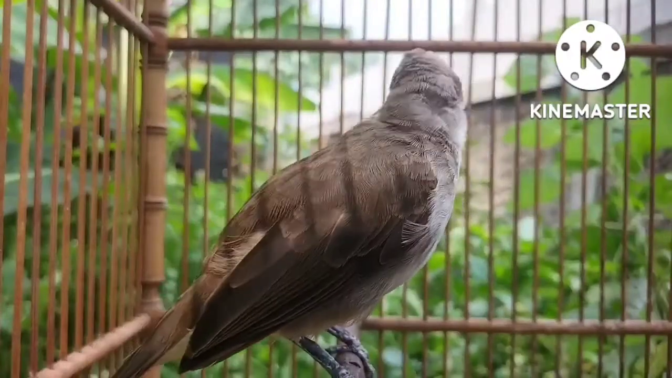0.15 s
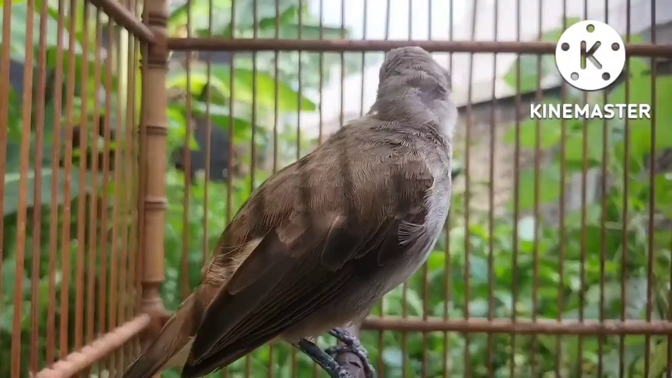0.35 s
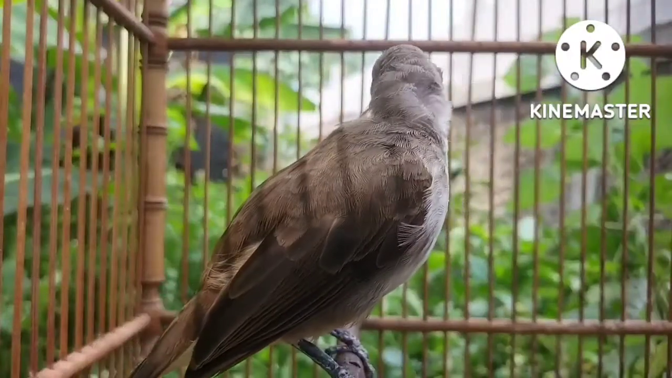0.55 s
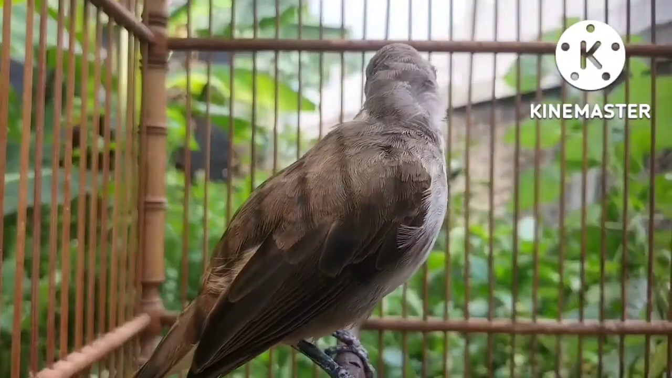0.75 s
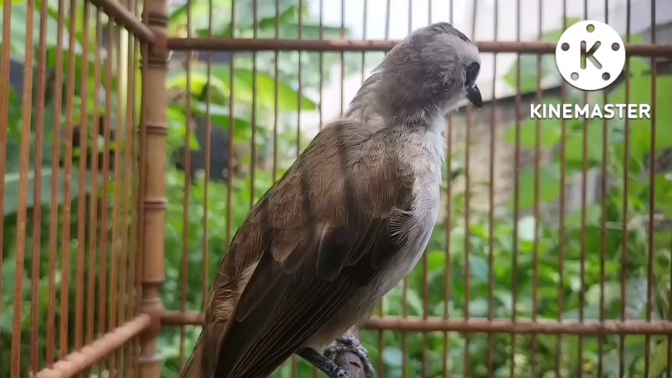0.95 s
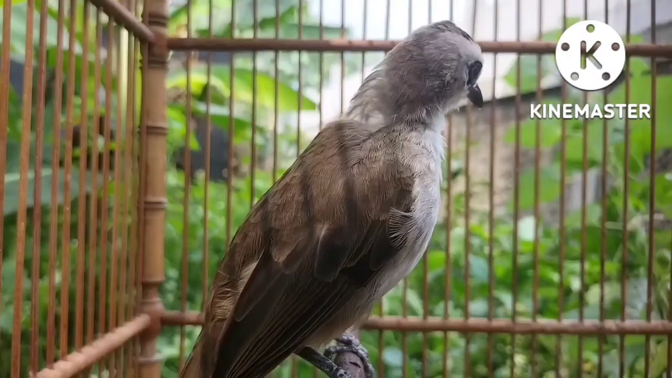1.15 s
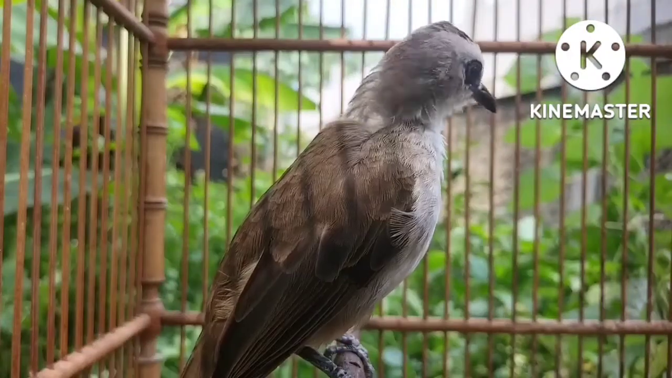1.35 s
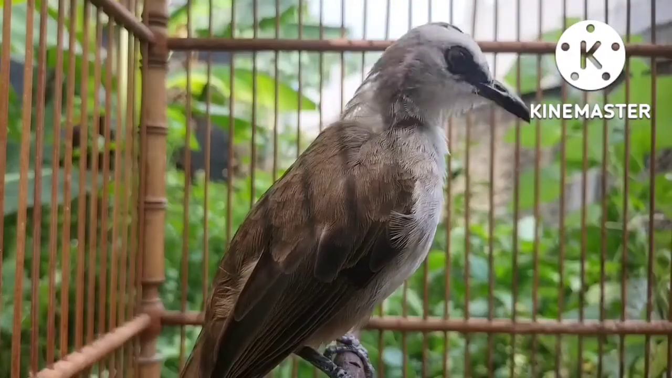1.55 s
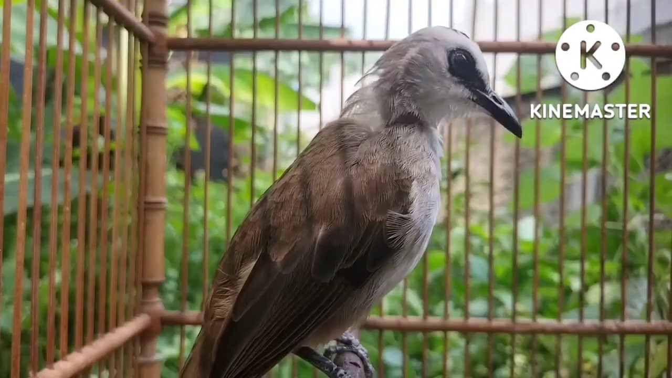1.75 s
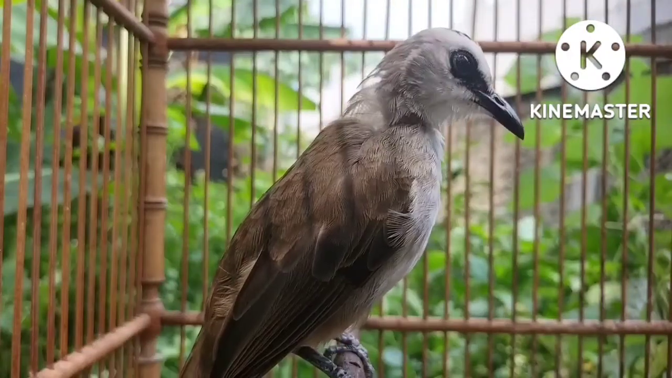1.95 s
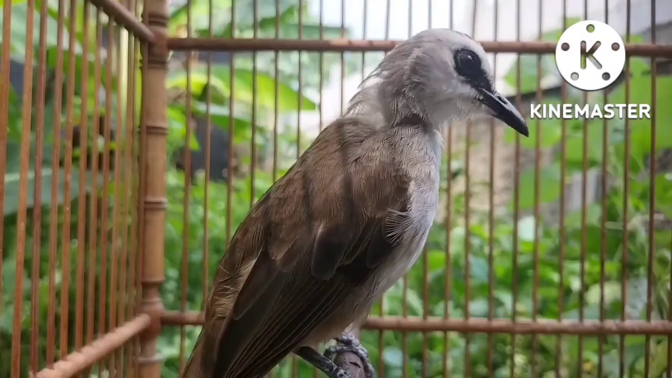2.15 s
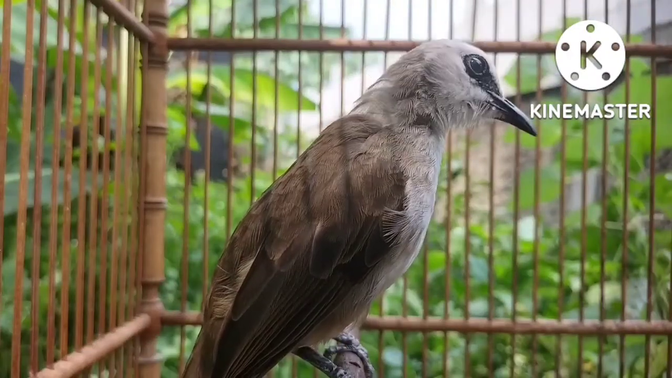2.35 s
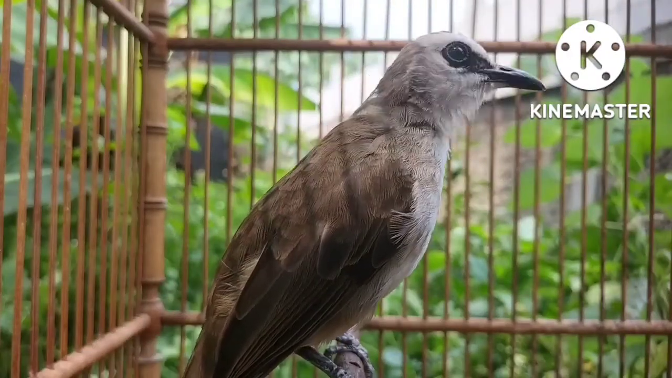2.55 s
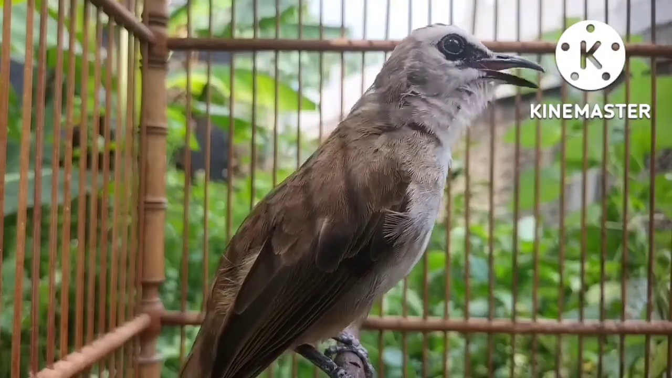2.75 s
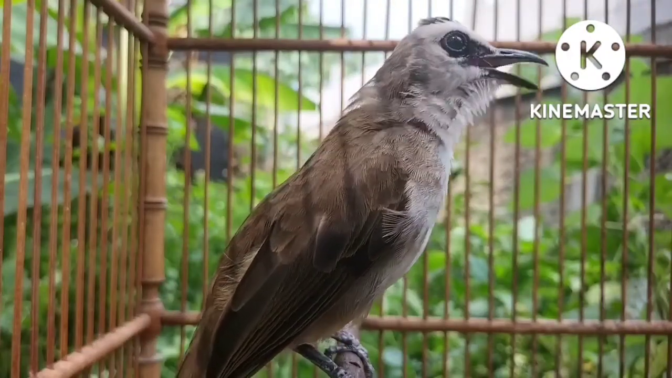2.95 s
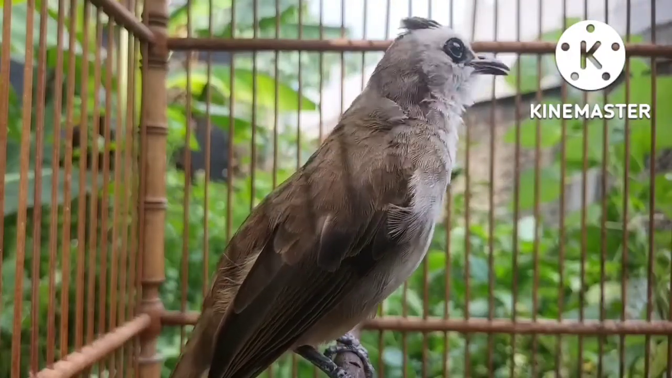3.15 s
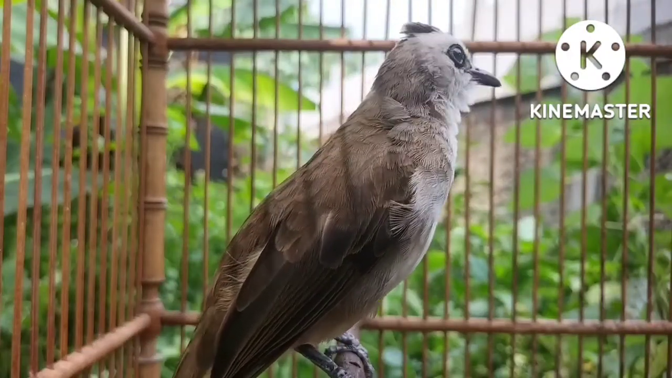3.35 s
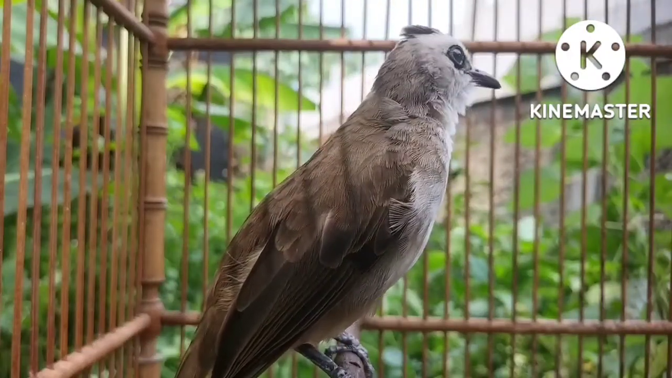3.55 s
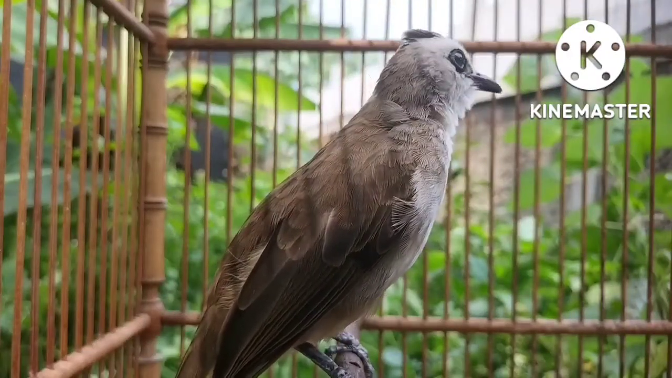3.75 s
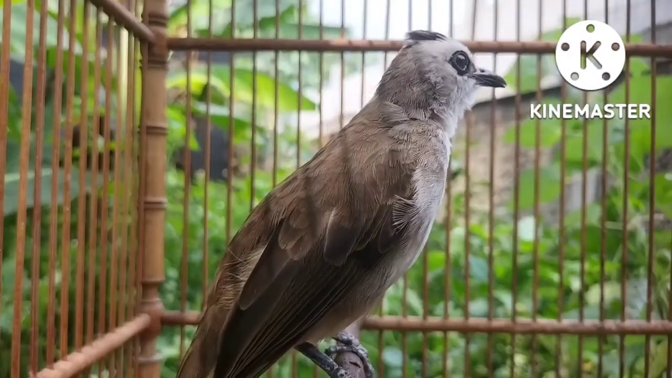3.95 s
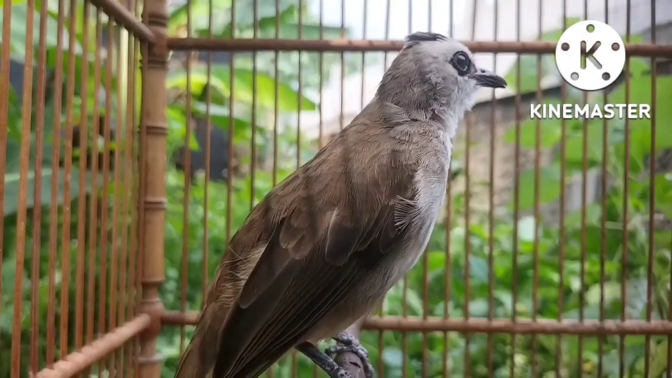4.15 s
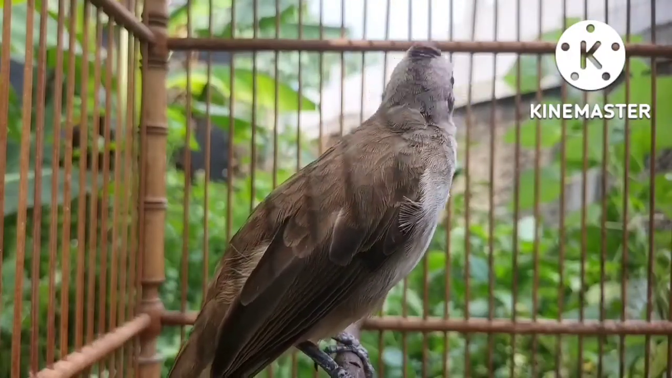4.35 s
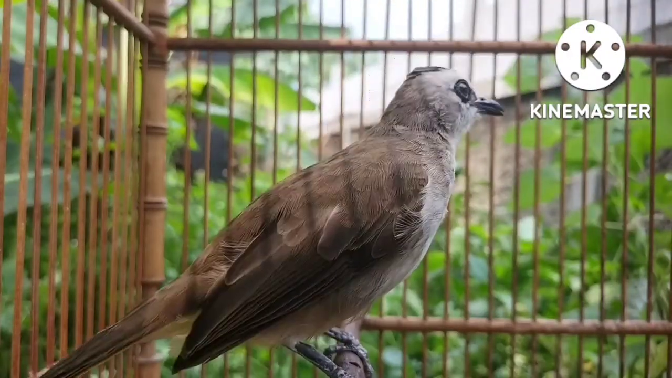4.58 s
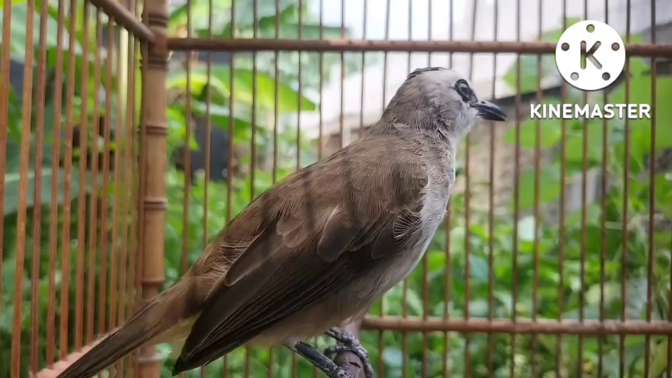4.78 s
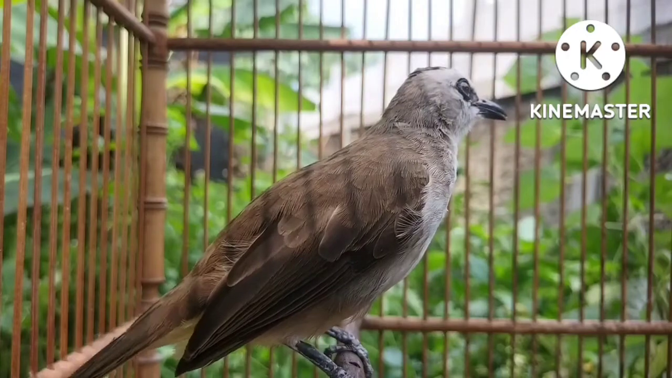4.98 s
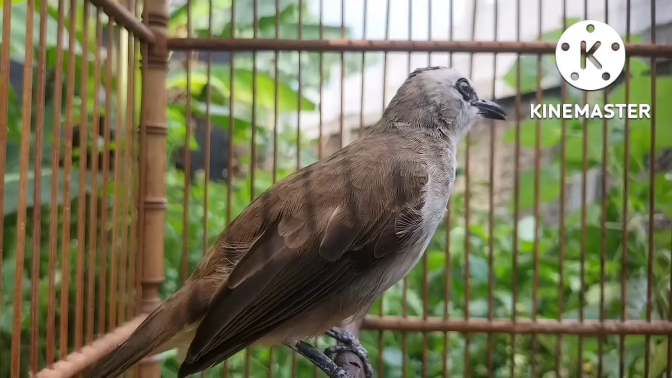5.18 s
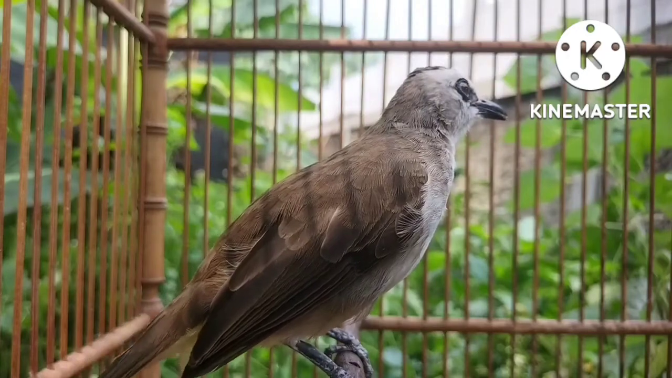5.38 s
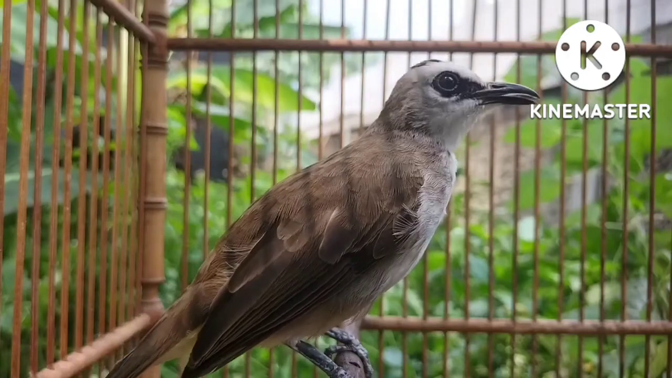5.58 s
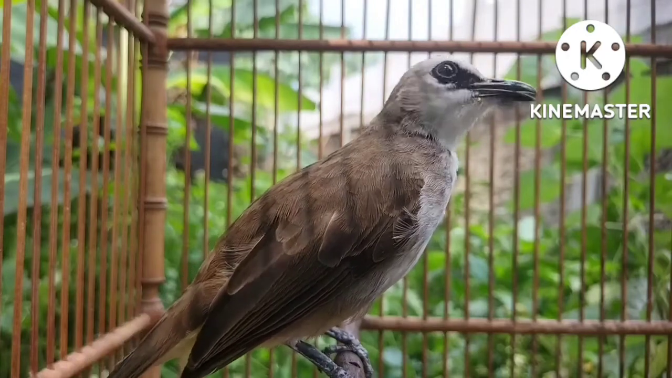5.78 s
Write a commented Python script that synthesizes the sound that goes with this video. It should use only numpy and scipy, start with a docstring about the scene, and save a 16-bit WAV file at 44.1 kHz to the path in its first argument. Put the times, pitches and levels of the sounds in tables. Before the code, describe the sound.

Soft bumps and perch rustles lead to three loud, slightly distorted bird chirps, with a faint cricket and distant engines behind.

```python
"""On a porch, a caged bulbul right in front of the microphone, the garden behind. At first there is only
rumble, a far engine and the thin buzz of a bush cricket's wings. After a second come dull bumps, then
ticks and rustles on the perch. From 2.8 s the bird gives three sharp calls that overload the microphone,
each a quick arch of pitch whose harmonics sweep through the throat resonance; cage and porch answer.
Afterwards faint birds whistle far off and an engine drones again under the cricket."""
import sys
import numpy as np
from scipy import signal
from scipy.fft import rfft, irfft
from scipy.io import wavfile

SR = 44100
rng = np.random.default_rng(int(sys.argv[2]) if len(sys.argv) > 2 else 0)


def store_wav(level_fs):
    """Save 16-bit WAV to argv[1]."""
    pcm = np.round(np.clip(np.atleast_2d(level_fs), -1, 1) * 32767)
    wavfile.write(sys.argv[1], SR, pcm.T.astype(np.int16))


N = 256662
TIME = np.arange(N) / SR

# Rumble and air of the garden. Each row: frequency in Hz, relative level in dB.
GARDEN_SPECTRUM = [(20, -17), (45, -6), (68, -1), (100, -4.5), (250, -15), (520, -24), (1050, -24),
                   (1800, -33.5), (2600, -32), (4000, -33.5), (5000, -40), (7300, -37.5), (9200, -50),
                   (16000, -61)]
# Engines far off. Each row: start in seconds, end in seconds, pitch in Hz, level in dB.
ENGINE_DRONES = [(0, 0.96, 81.11, -64.5), (4.3, 5.822, 64.6, -65)]
# Birds far off. Each row: start and length in seconds, start and end pitch in Hz, level in dB,
# waver as a share of the pitch.
FAR_WHISTLES = [(3.83, 0.12, 2262, 2398, -74.5, 0.07), (4.091, 0.069, 2253, 2446, -75, .05),
                (4.181, 0.14, 2356, 2429, -72.5, .05), (5.091, 0.204, 5630, 5570, -83, 0.0059),
                (5.14, 0.119, 6935, 7300, -83, 0.0061), (5.266, 0.083, 7100, 7159, -75, 0.0039),
                (5.391, 0.13, 7400, 7360, -80, .002), (5.349, 0.18, 5460, 5470, -77, 0.002),
                (5.419, 0.099, 2174, 2604, -75, 0.068), (5.201, 0.0487, 1000, 965, -71, 0.065),
                (5.458, 0.055, 760, 742, -67, 0.083)]
# The rasp of the cricket's wings. Each row: frequency in Hz, relative level in dB.
WING_SPECTRUM = [(5500, -44.5), (6700, -22.5), (7800, -23.5), (9000, -46), (11200, -36.5), (11600, -16),
                 (12300, -19), (13000, -13), (13700, -13), (14300, -2), (14550, -5), (14830, 7), (15000, 3),
                 (15130, 5), (15480, 0), (15600, -26)]
# The cricket's spells of song. Each row: start, step down in level and stop, all in seconds.
CRICKET_SPELLS = [(0, 1.855, 2.11), (2.655, 5.59, 5.71)]
# Dull bumps. Each row: middle and half length in seconds, pitch in Hz, level in dB.
LOW_BUMPS = [(1.018, 0.023, 135, -53), (1.067, 0.0087, 180, -48.5), (1.086, 0.014, 105, -44),
             (1.134, 0.013, 195, -47.5), (1.195, 0.017, 104, -44), (1.215, 0.034, 190, -50.5),
             (1.244, .012, 150, -48.5), (1.245, .035, 62, -51), (1.364, 0.016, 155, -53),
             (1.428, 0.025, 158, -55.5)]
# Rustles on the perch. Each row: middle and half length in seconds, centre and width in Hz, level in dB.
PERCH_RUSTLES = [(1.18, 0.11, 191, 179, -59.5), (1.5, 0.25, 150, 139, -62), (2.508, 0.015, 4740, 1204, -62),
                 (2.543, 0.038, 5970, 800, -66.5), (2.565, 0.047, 3960, 950, -64.5)]
# Small ticks in the cage, and short creaky voice pulses just before the calls. Each row: start in
# seconds, level in dB, ring and width in Hz, time to die by 60 dB in seconds.
TICKS_AND_PULSES = [(1.232, -66.5, 3130, 1500, 0.14), (2.510, -61, 4500, 5000, 0.012),
                    (2.554, -54, 4540, 6000, 0.007), (2.587, -56, 5000, 6000, 0.0092),
                    (2.681, -61, 4500, 6000, 0.009), (2.749, -50.5, 3050, 1500, 0.043),
                    (2.7603, -32.5, 3300, 1200, 0.018), (3.0816, -38.5, 1610, 647, 0.025),
                    (3.085, -36, 1948, 708, 0.019), (3.098, -28.5, 2300, 1100, 0.018),
                    (3.1062, -29.5, 2570, 1300, 0.019), (3.61, -54.5, 6920, 1500, 0.11),
                    (3.609, -55.5, 2287, 1500, 0.085)]
# Colour of the porch's echo. Each row: frequency in Hz, relative level in dB.
PORCH_SPECTRUM = [(300, -12), (1000, -8), (1500, -1.5), (2000, -6.5), (2700, -2.5), (3600, -9),
                  (5000, -8.5), (8000, -2), (15000, -21)]
# What throat and beak let through. Each row: frequency as a multiple of the resonance, gain in dB.
THROAT_RESPONSE = [(.15, -79), (.26, -51.5), (0.359, -26), (0.549, -20), (.68, -19), (.83, -4), (1, 0.5),
                   (1.14, -4), (1.331, -15.5), (1.648, -27.5), (2.351, -33.5), (2.85, -55), (4, -63.5)]
# The calls at the microphone. Each row: top of the arch in seconds; start, knee and top pitch in Hz;
# rise and fall in seconds; level in dB; full voice before and after the top in seconds; swell of the
# lead-in and leap to full voice in dB; time and half length of the voice break in seconds, its depth
# in dB; throat resonance in Hz, its sag in octaves; gain of the fundamental and of the overtones
# above the resonance in dB.
BULBUL_CALLS = [(2.784, 1082, 1263, 1864, 0.0084, 0.011, 0, 0.0028, 0.0125, 21.5, 15.5, 2.786, 0.0055, 5.5, 3211, 0.015, 4.5, -1),
                (2.8806, 1230, 1210, 1785, .0085, 0.016, 3.5, 0.0072, .0125, 8.5, 12.5, 2.8805, .0015, 16, 3081, 0.096, 3, -1.5),
                (3.139, 854.5, 1172, 1702, 0.0045, .0145, 8.5, .0086, .0112, 4.5, 10, 3.1388, 0.0048, 4.5, 2793, 0.0046, -6.5, -4)]

LEAD_IN_S, LEAP_S = 0.022, 0.0076  # a call's rough lead-in, and its last part that leaps to full voice


def undb(db):
    """Decibels to gain."""
    return 10 ** (np.asarray(db) / 20)


def unit(x):
    """Scale to rms 1."""
    return x / np.sqrt(np.mean(x ** 2))


def coloured(points, size=N):
    """Noise of rms 1 with a spectrum of (Hz, dB) points."""
    hz, db = np.transpose(points)
    f = np.maximum(np.fft.rfftfreq(size, 1 / SR), 1)
    gain = undb(np.interp(np.log(f), np.log(hz), db))
    return unit(irfft(rfft(rng.standard_normal(size)) * gain, size))


def resonance(f, hz, width_hz):
    """Complex response of one resonance, 1 at its centre."""
    return 1j * f * width_hz / (hz ** 2 - f ** 2 + 1j * f * width_hz)


def band(hz, width_hz, order=2):
    """Noise of rms 1, passed order times through a resonance."""
    response = resonance(np.fft.rfftfreq(N, 1 / SR), hz, width_hz) ** order
    return unit(irfft(rfft(rng.standard_normal(N)) * response, N))


def wander(rate, size=N):
    """Smooth random motion of rms 1, changing about rate times a second."""
    return unit(signal.sosfilt(signal.butter(2, rate, fs=SR, output="sos"), rng.standard_normal(size)))


def bell(t, middle, half):
    """A bell curve, 1 at its middle."""
    return np.exp(-((t - middle) / half) ** 2)


def fade(s, length_s=0.026):
    """A ramp from 0 to 1 around the given time."""
    return np.clip(.5 + (TIME - s) / length_s, 0, 1)


def garden_air(level_db=-62.5):
    """Steady rumble and faint hiss from beyond the porch."""
    return coloured(GARDEN_SPECTRUM) * undb(level_db)


def far_engines(waver=0.027, fade_s=0.17):
    """Engines a long way off: low wavering tones that fade in and out."""
    out = np.zeros(N)
    for start, end, hz, db in ENGINE_DRONES:
        envelope = np.minimum(fade(start, fade_s), 1 - fade(end, fade_s))
        pitch = hz * (1 + waver * wander(7.8))
        out += undb(db) * envelope * unit(np.sin(2 * np.pi * np.cumsum(pitch) / SR))
    return out


def far_birds(echo_db=-7, echo_t60=0.6):
    """Faint gliding whistles, clean or wavering, that reach the microphone with the garden's echoes."""
    out = np.zeros(N)
    for s, length, start_hz, end_hz, db, waver in FAR_WHISTLES:
        progress = np.clip((TIME - s) / length, 0, 1)
        pitch = (start_hz + (end_hz - start_hz) * progress) * (1 + waver * wander(121))
        out += undb(db) * np.sin(np.pi * progress) * np.sin(2 * np.pi * np.cumsum(pitch) / SR)
    echoes = rng.standard_normal(N) * undb(-60 * TIME / echo_t60)
    return out + undb(echo_db) * signal.fftconvolve(out, echoes / np.linalg.norm(echoes))[:N]


def cricket(level_db=-59.7, chirps_per_s=23.2, drift=0.02, uneven_db=1, between_db=-11, step_db=-6):
    """Out in the garden each wing stroke rasps a puff of very high noise; three make a chirp."""
    stroke_gap_s, stroke_half_s = 0.0113, 0.0034
    chirp_rate = chirps_per_s * (1 + drift * wander(2.7))
    chirp_age = np.cumsum(chirp_rate) / SR % 1 / chirps_per_s
    strokes = sum(bell(chirp_age, k * stroke_gap_s, stroke_half_s) for k in (1, 2, 3))
    envelope = unit((strokes + undb(between_db)) * undb(uneven_db * wander(60)))
    spells = sum((fade(start) - fade(stop)) * undb(step_db * fade(sink))
                 for start, sink, stop in CRICKET_SPELLS)
    return envelope * coloured(WING_SPECTRUM) * spells * undb(level_db)


def bumps(waver=0.059):
    """Soft knocks, each a few cycles of a low tone."""
    out = np.zeros(N)
    for s, half, hz, db in LOW_BUMPS:
        pitch = hz * (1 + waver * wander(66))
        out += undb(db) * bell(TIME, s, half) * np.sin(2 * np.pi * np.cumsum(pitch) / SR)
    return out


def rustles():
    """Low shuffling and light brushing on the perch, close by: short swells of noise."""
    return sum(undb(db) * bell(TIME, s, half) * band(hz, width)
               for s, half, hz, width, db in PERCH_RUSTLES)


def ticks_and_pulses(rise_s=0.0007):
    """Small ticks in the cage and creaky voice pulses just before the calls, each a short noisy ring."""
    out = np.zeros(N)
    for s, db, hz, width_hz, t60 in TICKS_AND_PULSES:
        age = np.maximum(TIME - s, 0)
        rise = 1 - bell(age, 0, rise_s)
        out += undb(db - 60 * age / t60) * rise * band(hz, width_hz, order=3)
    return out


def porch(direct, near_db=-15, near_t60=0.065, late_db=-28.5, late_t60=0.258, first_s=0.0053):
    """The direct sound, quick scatter from the cage and near walls, then a weak longer tail."""
    size = SR // 2
    age = np.maximum(TIME[:size] - first_s, 0)
    f = np.fft.rfftfreq(size, 1 / SR)
    voice_band = (f > 2300) & (f < 3600)  # each echo's level holds where the bird's voice lies
    response = np.zeros(size)
    for db, t60 in ((near_db, near_t60), (late_db, late_t60)):
        tail = coloured(PORCH_SPECTRUM, size) * undb(-60 * age / t60) * (age > 0)
        voice_gain = np.sqrt(np.mean(np.abs(rfft(tail)[voice_band]) ** 2))
        response += undb(db) * tail / voice_gain
    return direct + signal.fftconvolve(direct, response)[:N]


def arch(age, before_s, start_hz, knee_hz, top_hz, rise_s, fall_s):
    """A call's pitch creeps to a knee, flicks to the top at age 0 and sinks as the syrinx slackens."""
    slack_hz, rise_shape, fall_shape = 823, 2.2, 1.1
    creep = knee_hz + (start_hz - knee_hz) * np.clip((-before_s - age) / LEAD_IN_S, 0, 1)
    climb = creep + (top_hz - creep) * np.exp(-np.abs(age / rise_s) ** rise_shape)
    sink = slack_hz + (top_hz - slack_hz) * np.exp(-np.abs(age / fall_s) ** fall_shape)
    return np.where(age < 0, climb, sink)


def effort(age, before_s, after_s, swell_db, leap_db, release_s, onset_s=0.0075, drop_db=37.5):
    """Gain of a call: lead-in, leap, hold around the top of the arch, release."""
    early = np.maximum(-before_s - age, 0)
    onset = np.clip((LEAD_IN_S - early) / onset_s, 0, 1)
    attack_db = swell_db * early / LEAD_IN_S + leap_db * np.minimum(early / LEAP_S, 1)
    release_db = drop_db * np.maximum(age - after_s, 0) / release_s
    return onset * undb(-attack_db - release_db)


def call(row, jitter=0.011, slack_jitter=0.026, shimmer_db=2.0, rasp_db=-29, tense_hz=1300,
         lead_rough=0.94, lead_thin_db=-10, sag_s=0.047, release_s=0.01792):
    """A stack of harmonics arches up and down; the one inside the throat resonance carries the call."""
    (top_s, start_hz, knee_hz, top_hz, rise_s, fall_s, level_db, before_s, after_s, swell_db, leap_db,
     break_at, break_s, break_db, throat_hz, sag_octaves, fundamental_db, overtone_db) = row
    on = (TIME > top_s - before_s - LEAD_IN_S) & (TIME < top_s + after_s + 2 * release_s)
    age = TIME[on] - top_s
    pitch = arch(age, before_s, start_hz, knee_hz, top_hz, rise_s, fall_s)
    # the syrinx is rough in the lead-in and when slack at the end of the arch, clean when tense
    lead_in = np.clip((-before_s - age) / LEAP_S, 0, 1)
    slack = np.clip(np.maximum(3 * (1 - pitch / tense_hz), lead_rough * lead_in), 0, 1)
    pitch *= 1 + (jitter + slack_jitter * slack) * wander(400, len(age))
    phase = 2 * np.pi * np.cumsum(pitch) / SR
    ratios, throat_db = np.transpose(THROAT_RESPONSE)
    rasp = coloured(np.column_stack([ratios * throat_hz, throat_db]), len(age))
    voice = undb(rasp_db) * (1 + 2 * slack) * rasp
    # the beak is widest at the top of the arch; to either side the throat resonance sags
    moving_throat_hz = throat_hz * 2 ** (-sag_octaves * np.minimum((age / sag_s) ** 2, 1))
    for k in range(1, 13):
        ratio = k * pitch / moving_throat_hz
        db = np.interp(np.log(ratio), np.log(ratios), throat_db)
        db += fundamental_db * (k == 1) + overtone_db * np.clip(2 * (ratio - 1), 0, 1)
        db += lead_thin_db * lead_in * np.clip(5 * (.85 - ratio), 0, 1)  # thin below the resonance
        db += shimmer_db * slack * wander(340, len(age))
        lag = 2 * np.angle(resonance(ratio, 0.97, 0.13))  # the throat rings on after each pulse
        voice += undb(db) * np.sin(k * phase + lag)
    envelope = effort(age, before_s, after_s, swell_db, leap_db, release_s)
    dip_db = break_db * bell(TIME[on], break_at, break_s)
    out = np.zeros(N)
    out[on] = voice * envelope * undb(level_db - dip_db)
    return out


def bulbul(lowest_hz=990):
    """The three calls, right in front of the microphone; so small a body radiates no bass."""
    voice = sum(call(row) for row in BULBUL_CALLS)
    return signal.sosfiltfilt(signal.butter(4, lowest_hz, "high", fs=SR, output="sos"), voice)


def scene():
    """One microphone on the porch: the bird and its small noises up close, the garden behind."""
    garden = garden_air() + cricket() + far_birds() + far_engines()
    cage = porch(bulbul() + ticks_and_pulses() + rustles())
    return (cage + bumps() + garden)[None]


def record(dry, low_cut_hz=40, top_hz=15900, knee=14):
    """The calls overload the microphone, adding a bright third harmonic; deep bass and the top are cut."""
    clipped = dry / (1 + np.abs(dry) ** knee) ** (1 / knee)
    thinned = signal.sosfilt(signal.butter(2, low_cut_hz, "high", fs=SR, output="sos"), clipped)
    return signal.sosfiltfilt(signal.ellip(8, .05, 50, top_hz, fs=SR, output="sos"), thinned)


dry = scene()
out = record(dry)
store_wav(out)
```